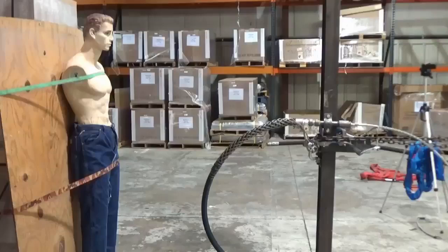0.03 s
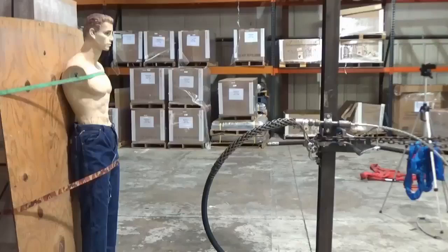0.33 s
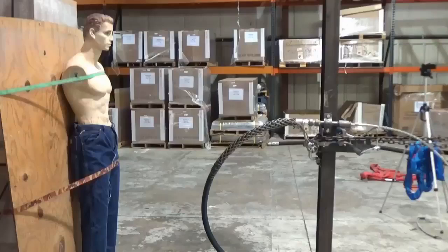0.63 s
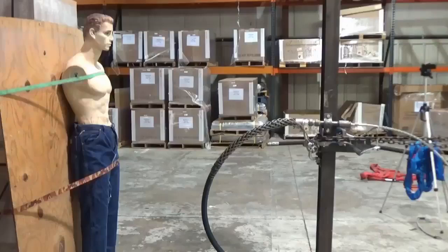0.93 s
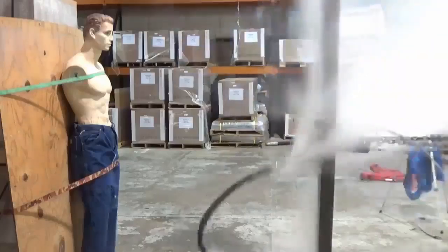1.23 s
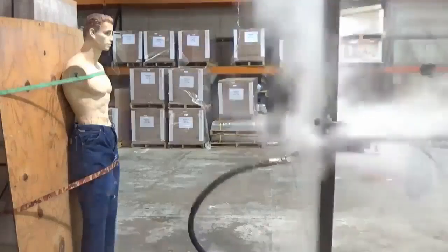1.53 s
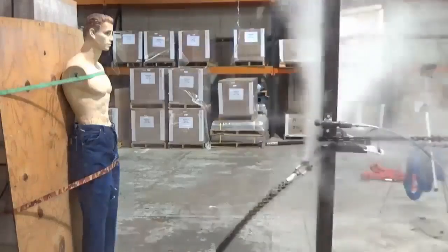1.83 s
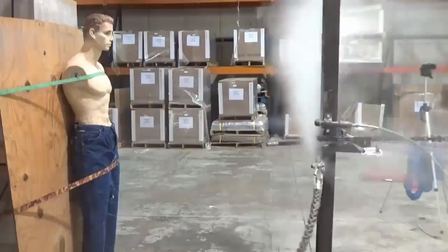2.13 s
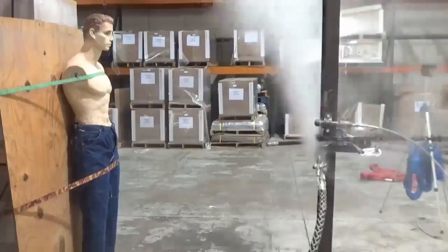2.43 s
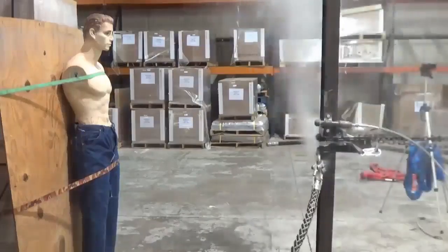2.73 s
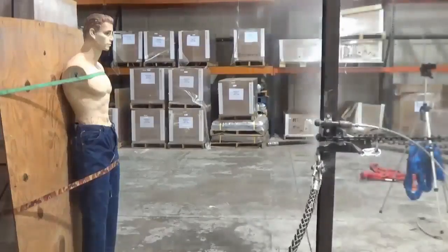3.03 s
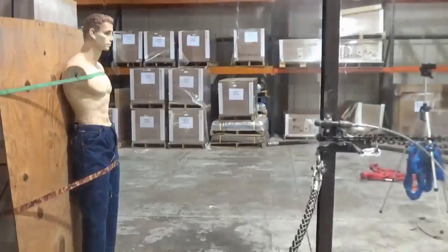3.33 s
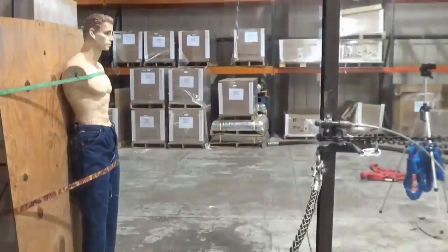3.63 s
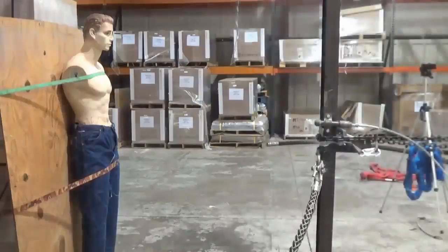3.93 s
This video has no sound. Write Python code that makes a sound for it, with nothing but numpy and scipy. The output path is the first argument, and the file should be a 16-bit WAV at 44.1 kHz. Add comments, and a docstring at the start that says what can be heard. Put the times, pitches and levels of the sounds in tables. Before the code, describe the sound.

Pressurised air leaks from a hose coupling with a soft hiss, over a low warehouse hum and a few dull knocks. At about 1.2 seconds the coupling lets go and air bursts out in a loud hiss and roar with low puffs. The roar dies down from around 2.3 seconds. A thinner hiss with faint, brief whistles remains, weakening from 3.3 seconds but still audible at 4.

```python
"""A pressurised air hose leaks softly at its coupling in a warehouse, over a low hum and dull knocks.
At 1.19 s the coupling lets go, and the stored air surges out as a turbulent jet: the loose hose roars
into the hall with low puffs, while the open fitting hisses straight at the listener.
The roar dies as the hose empties. Its bass drops away in steps. A thinner hiss remains, with brief
edge tones whistling at the rim of the fitting, and fades as the pressure drops."""
import sys
import numpy as np
from scipy import signal
from scipy.fft import rfft, irfft
from scipy.io import wavfile
from scipy.ndimage import uniform_filter1d

SR = 44100
rng = np.random.default_rng(int(sys.argv[2]) if len(sys.argv) > 2 else 0)


def log_audio(samples):
    """Write samples as a 16-bit WAV file to the path given in sys.argv[1]."""
    # one column per channel
    frames = np.atleast_2d(samples).T
    # limit to full scale, then quantise
    limited = np.clip(frames, -1, 1)
    pcm = np.round(limited * 32767).astype(np.int16)
    wavfile.write(sys.argv[1], SR, pcm)


N = 176400
TIME = np.arange(N) / SR
BURST_S, OPEN_S = 1.1905, .008  # when the coupling lets go, and how long it takes to part


def jet():
    """Sudden release of pressure: the air escapes with a first surge that relaxes exponentially."""
    surge_db, decay_s = 5, .032
    surge = amp(surge_db * np.exp(-np.maximum(TIME - BURST_S, 0) / decay_s))
    return (hose_roar() + fitting_hiss() + fizz()) * surge * opening()


def hose_roar():
    """Turbulent mixing: the loose hose roars diffusely. The bass drops away in steps as the roar fades."""
    # envelope: time_s, level_db
    levels = [(1.2, -25.5), (1.26, -25), (1.32, -21.5), (1.42, -23), (1.56, -23.5), (1.68, -19.5),
              (1.9, -18.3), (2.09, -20.5), (2.17, -22.5), (2.28, -23), (2.45, -26), (2.8, -32.5),
              (3.0, -30.5), (3.3, -31.5), (3.6, -41.5), (4, -45)]
    # spectrum: frequency_hz, density_db
    colour = [(25, -6), (60, -10.5), (130, -3.5), (400, 2), (800, 2), (1400, 1), (2500, -2.5), (4000, -7.5),
              (6500, -34), (12000, -82)]
    # left-right likeness: frequency_hz, correlation
    likeness = [(30, 1), (70, 0.54), (200, 0.56), (450, 0.23), (850, -0.2), (1600, -0.02), (4000, -0.31)]
    # rising lower band edge: time_s, cutoff_hz
    edge = [(1.2, 35), (2.35, 35), (2.55, 80), (3.36, 100), (3.45, 225), (3.64, 250), (3.71, 390), (4, 390)]
    air = turbulence(colour, likeness, patchy_db=2.5, flutter_db=.46, low_edge=edge, size=2048)
    return air * amp(at_time(levels))


def fitting_hiss():
    """Direct sound: jet noise from the open fitting reaches both ears nearly alike."""
    # envelope: time_s, level_db
    levels = [(1.2, -19.5), (1.23, -16), (1.27, -19), (1.3, -15.6), (1.35, -16.8), (1.45, -16), (1.54, -17),
              (1.75, -16.3), (2.2, -17.3), (2.42, -15.6), (2.68, -15.6), (2.8, -17.8), (2.95, -15.8),
              (3.1, -16.4), (3.33, -15.8), (3.55, -18.8), (3.75, -21.6), (4, -23.5)]
    # spectrum: frequency_hz, density_db
    colour = [(220, -85), (380, -34), (600, -18), (1200, -10.5), (1700, -3.8), (2200, -4.1), (2800, -2),
              (4000, -1.3), (5000, -.7), (6100, .3), (7000, -1.7), (8200, -7), (11000, -50)]
    # left-right likeness: frequency_hz, correlation
    likeness = [(600, 1), (1700, 0.9), (3000, 0.96), (6300, 0.98), (7600, 0.057)]
    air = turbulence(colour, likeness, patchy_db=2.3, flutter_db=.13, sway=.5, size=4096)
    return air * amp(at_time(levels))


def fizz():
    """Jet noise in two shimmering treble bands; wandering correlation makes their width sway."""
    # envelopes of the fizz and of the sizzle above it: time_s, level_db
    fizz_levels = [(1.2, -19), (1.5, -18.5), (1.9, -19.5), (2.4, -18.2), (2.75, -20), (3.0, -18.5),
                   (3.25, -21), (3.45, -26.5), (3.7, -28.5), (4, -29.5)]
    sizzle_levels = [(1.2, -22.7), (1.7, -22.5), (2.1, -22.7), (2.4, -21.5), (2.8, -23.7), (3.3, -24.2),
                     (3.65, -25.7), (4, -25.7)]
    # their spectra: frequency_hz, density_db
    fizz_colour = [(500, -80), (4000, -32), (6400, -14), (7300, 2), (7800, 1.5), (8400, 6.5), (9200, 8),
                   (10000, 5), (10800, -2), (12500, -20)]
    sizzle_colour = [(1000, -80), (8500, -22), (10500, -2), (11500, -1), (12500, 0), (14000, -3.5),
                     (15700, -9)]
    # left-right likeness: frequency_hz, correlation
    likeness = [(7000, .95), (7900, .46), (8500, -.6), (9500, -.8), (11300, -.95), (13000, -.5),
                (15500, -.16)]
    return sum(turbulence(colour, likeness, patchy_db=3.6, flutter_db=1.4, sway=2.2) * amp(at_time(levels))
               for colour, levels in [(fizz_colour, fizz_levels), (sizzle_colour, sizzle_levels)])


def whistles():
    """Edge tones: air passing the rim of the fitting sounds briefly in narrow bands."""
    # whistles: centre_s, length_s, pitch_hz, level_db
    tones = [(1.52, .18, 5965, -33), (3.03, .16, 6105, -29.5), (3.4, .25, 3835, -36),
             (3.57, .22, 4950, -33), (3.7, .35, 9000, -37), (3.76, .2, 12300, -36)]
    return sum(amp(db) * swell(centre_s, length_s) * ringing(hz, width_hz=170, spread=.16)
               for centre_s, length_s, hz, db in tones)


def buffets():
    """Band-limited noise in short swells, heard as low puffs inside the roar."""
    # puffs: centre_s, length_s, pitch_hz, level_db
    puffs = [(1.903, 0.057, 169, -32), (2.244, 0.12, 218, -31.5), (2.6, 0.033, 69.5, -52),
             (2.82, .03, 150, -44), (2.928, 0.026, 141, -38), (3.092, 0.087, 98, -47),
             (3.28, 0.036, 107, -47), (3.65, 0.024, 265, -55), (3.82, 0.036, 252, -48)]
    out = np.zeros((2, N))
    for centre_s, length_s, hz, db in puffs:
        band = signal.butter(4, [hz / 1.3, hz * 1.3], "band", fs=SR, output="sos")
        mid, side = signal.sosfilt(band, rng.standard_normal((2, N)))
        out += amp(db) * swell(centre_s, length_s) * stereo(mid, .4 * side)
    return out


def leak():
    """Flow through a narrow gap: air seeps turbulently past the seal until the coupling parts."""
    # envelope: time_s, level_db
    levels = [(0, -32.5), (.13, -33.5), (.26, -37), (.46, -37.3), (.5, -33), (.6, -30.5), (.72, -31.3),
              (.95, -31.3), (1.08, -33.5), (1.17, -33.8), (1.19, -30)]
    # spectrum: frequency_hz, density_db
    colour = [(40, -14), (250, -9), (600, -6.5), (1100, -5.5), (1900, -4.5), (2250, -.5), (3400, -1),
              (4300, -2.5), (5300, -.5), (6900, -1), (7600, -4.5), (8200, 1), (9200, 1.5), (11300, -6.5),
              (14000, -10), (15200, -26)]
    # left-right likeness: frequency_hz, correlation
    likeness = [(80, 0.59), (1000, 0.65), (6300, 0.54), (7700, -1), (9000, 0.39), (11000, -0.51),
                (14000, 0.034)]
    air = turbulence(colour, likeness, patchy_db=2.2, flutter_db=.5, sway=.33, size=2048)
    return air * amp(at_time(levels)) * (1 - opening())


def knocks():
    """Modal resonance: dull bumps, smeared by the hall, all ring the same modes."""
    # bumps: peak_s, level_db, rise_s, decay_s, low_mode_boost_db
    bumps = [(.142, -33.5, 0.037, 0.047, 0.5), (.49, -35, 0.011, 0.017, 1), (.805, -39.5, 0.022, 0.035, 1),
             (.914, -31, 0.024, 0.04, 1)]
    # resonances: pitch_hz, width_hz, gain_db
    modes = [(239, 65, -10), (413, 44, -11), (574, 100, -12), (765, 160, -5.5), (1110, 1300, -6)]
    low_modes_below_hz = 650
    out = np.zeros((2, N))
    for hz, width_hz, mode_db in modes:
        envelope = np.zeros(N)
        for peak_s, db, rise_s, decay_s, boost_db in bumps:
            peak = amp(db + boost_db * (hz < low_modes_below_hz))
            envelope += peak * np.exp(-np.maximum((peak_s - TIME) / rise_s, (TIME - peak_s) / decay_s))
        out += amp(mode_db) * envelope * ringing(hz, width_hz, spread=.35)
    return out


def machine_hum():
    """Beating: a machine's low tone wavers against a narrow noise band, until the jet starts."""
    # envelope: time_s, level_db
    levels = [(0, -43), (.1, -44), (.2, -47), (.3, -45.5), (.46, -42.5), (.53, -47), (.67, -42), (.78, -50),
              (.97, -49), (1.17, -53)]
    pitch_hz = 82
    tone = np.sin(2 * np.pi * pitch_hz * TIME)
    waver = .4 * ringing(pitch_hz, width_hz=32, spread=.061)
    return unit(tone + waver) * amp(at_time(levels)) * (1 - opening())


def hall_air():
    """Ambient noise: the steady, low air of the warehouse, heard until the jet starts."""
    # spectrum: frequency_hz, density_db
    colour = [(25, -6), (55, 8), (140, -2), (250, 1.5), (450, 2.5), (900, -1), (1800, -8), (5000, -32)]
    # left-right likeness: frequency_hz, correlation
    likeness = [(80, 1), (400, 1), (1200, 0.86)]
    return turbulence(colour, likeness, patchy_db=3.0, flutter_db=.8) * amp(-45.5) * (1 - opening())


def turbulence(colour, likeness, patchy_db, flutter_db, sway=0, low_edge=None, size=1024):
    """Random modulation of air noise: patches of the spectrum swell and dip, giving a watery flicker."""
    hop = size // 4
    frames, hz = N // hop + 5, np.fft.rfftfreq(size, 1 / SR)
    left_re, left_im, other_re, other_im, patches, drift = rng.standard_normal((6, frames, len(hz)))
    patches = smooth(patches, frames=12, bins=5)
    drift = smooth(drift, frames=10, bins=18)
    flutter = unit(uniform_filter1d(rng.standard_normal(frames), size=7))[:, None]
    resting_correlation = np.clip(at_pitch(likeness, hz), -.995, .995)
    correlation = np.tanh(np.arctanh(resting_correlation) + sway * drift)
    left = left_re + 1j * left_im
    right = correlation * left + np.sqrt(1 - correlation ** 2) * (other_re + 1j * other_im)
    gain = amp(at_pitch(colour, hz) + patchy_db * patches + flutter_db * flutter)
    spectra = np.array([left, right]) * gain
    if low_edge is not None:
        cutoff_hz = at_time(low_edge, np.arange(frames) * hop / SR)[:, None]
        spectra /= np.sqrt(1 + (cutoff_hz / (hz + 1)) ** 20)  # tenth-order high-pass
    _, air = signal.istft(spectra.transpose(0, 2, 1), nperseg=size, noverlap=size - hop)
    return unit(air[:, :N])


def ringing(hz, width_hz, spread):
    """Resonance driven by noise; spread is the share of side signal."""
    bin_hz = np.fft.rfftfreq(N, 1 / SR)
    noise = rfft(rng.standard_normal((2, N)))
    mid, side = irfft(noise / (1 + (2 * (bin_hz - hz) / width_hz) ** 2), N)
    return stereo(mid, spread * side)


def opening():
    """How far the coupling has parted, 0 to 1."""
    return np.clip((TIME - BURST_S) / OPEN_S, 0, 1)


def swell(centre_s, length_s):
    """Gaussian envelope."""
    return np.exp(-(2 * (TIME - centre_s) / length_s) ** 2)


def smooth(field, frames, bins):
    """Moving average over time and frequency, at rms 1."""
    return unit(uniform_filter1d(uniform_filter1d(field, frames, axis=0), bins, axis=1))


def stereo(mid, side):
    """Sum and difference give left and right, at rms 1."""
    return unit(np.array([mid + side, mid - side]))


def amp(db):
    """Decibels to gain."""
    return 10 ** (np.asarray(db) / 20)


def unit(x):
    """Scales to rms 1."""
    return x / np.sqrt(np.mean(x ** 2) + 1e-20)


def at_time(points, t=TIME):
    """Reads a curve over time."""
    return np.interp(t, *np.transpose(points))


def at_pitch(points, hz):
    """Reads a curve over log frequency."""
    point_hz, value = np.transpose(points)
    return np.interp(np.log(hz + 1), np.log(point_hz + 1), value)


def scene():
    """Superposition of the hall, the leak and the blow-out."""
    return hall_air() + machine_hum() + knocks() + leak() + jet() + buffets() + whistles()


def record(dry):
    """Band limiting: a steep low-pass removes the highest treble."""
    cutoff_hz = 15900
    lowpass = signal.firwin(511, cutoff_hz, window=("kaiser", 9), fs=SR)
    return signal.oaconvolve(dry, lowpass[None], "same")


dry = scene()
out = record(dry)
log_audio(out)
```